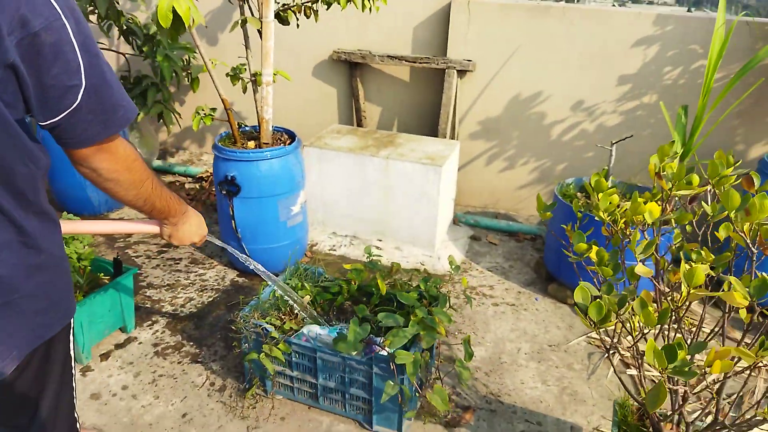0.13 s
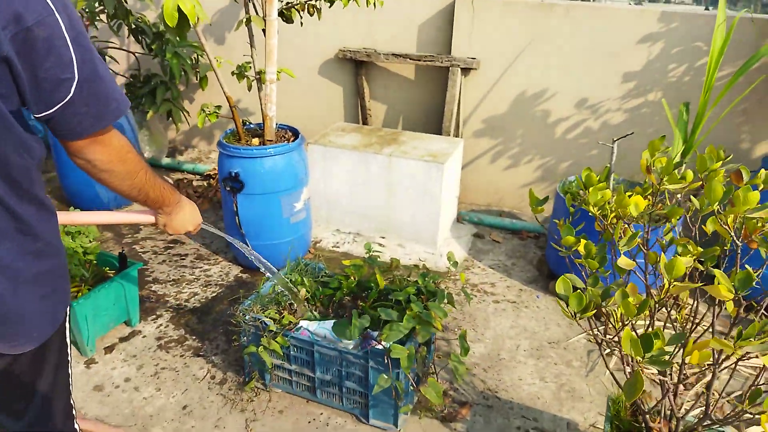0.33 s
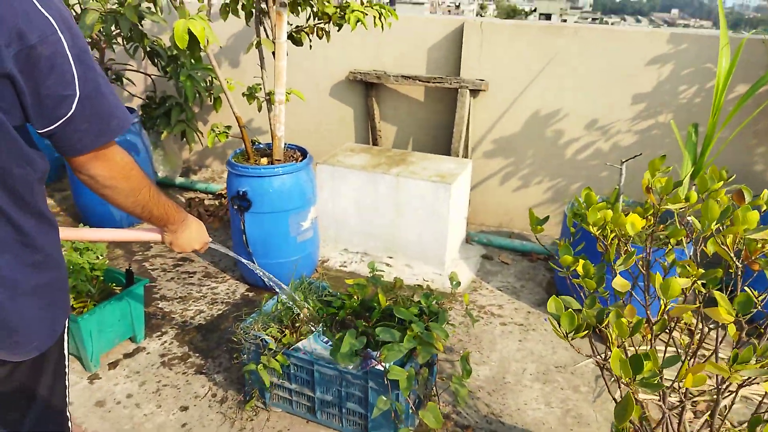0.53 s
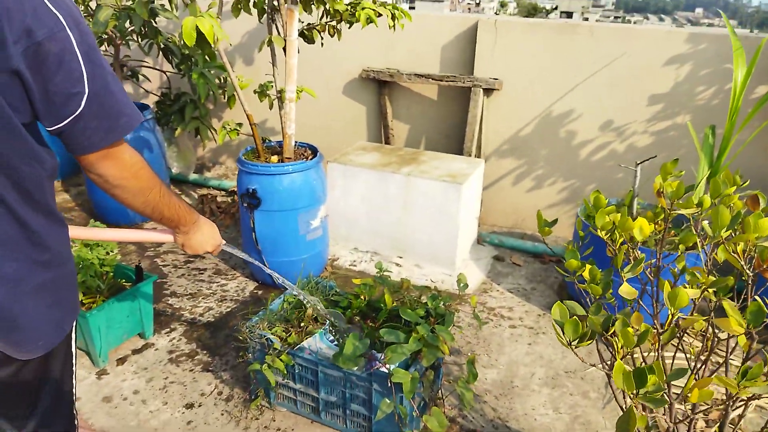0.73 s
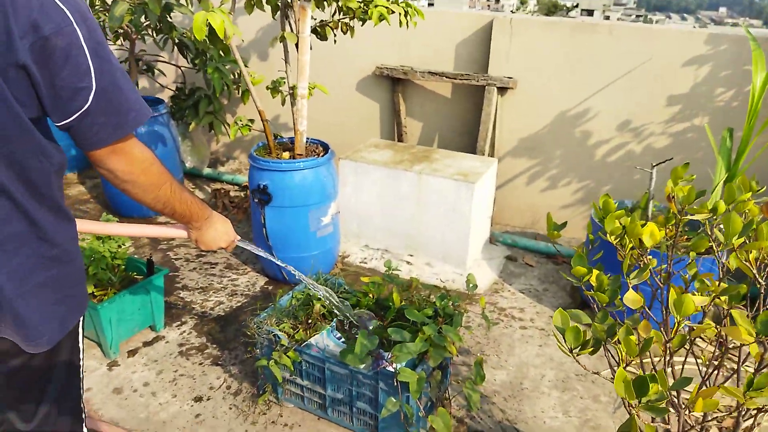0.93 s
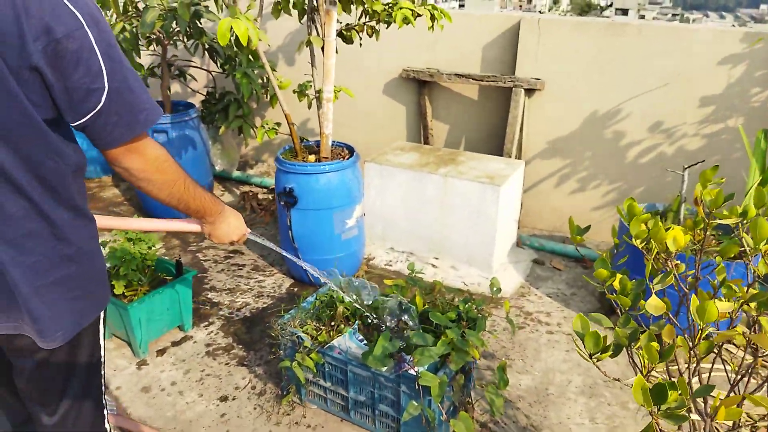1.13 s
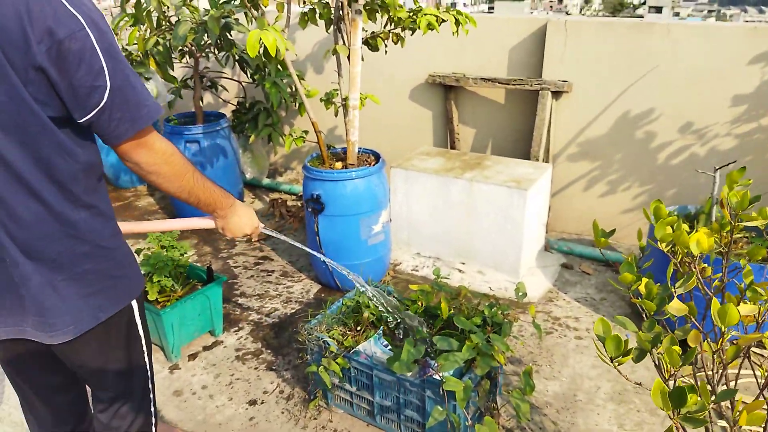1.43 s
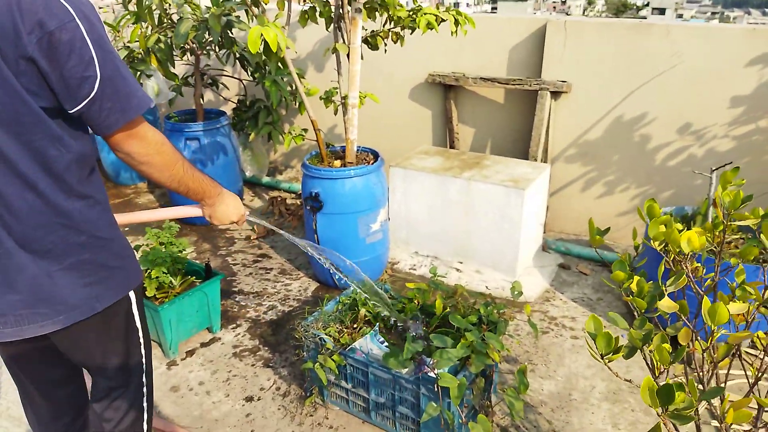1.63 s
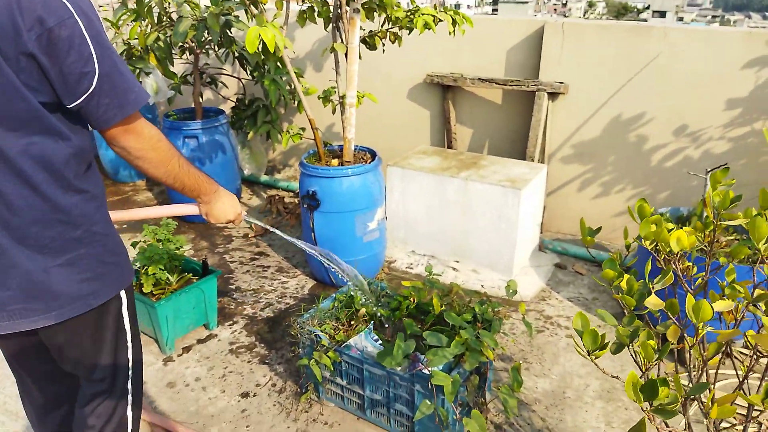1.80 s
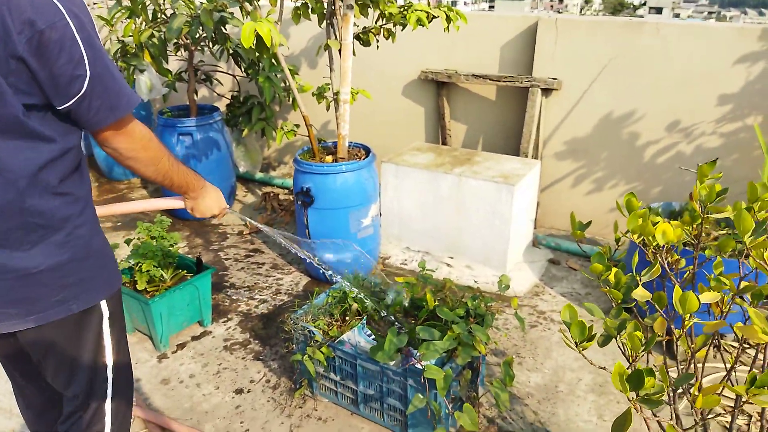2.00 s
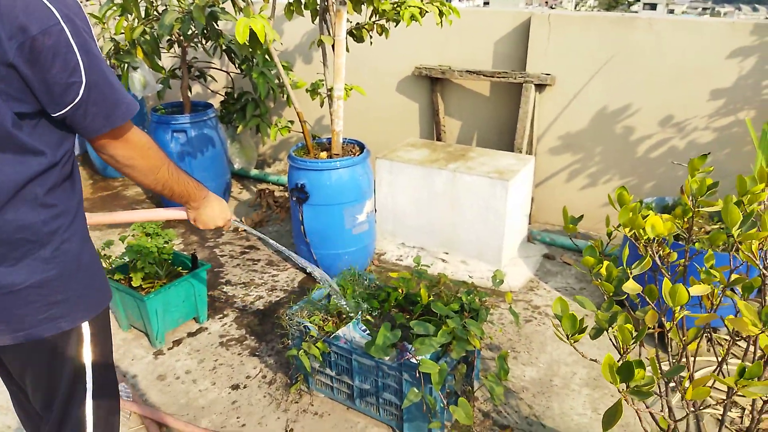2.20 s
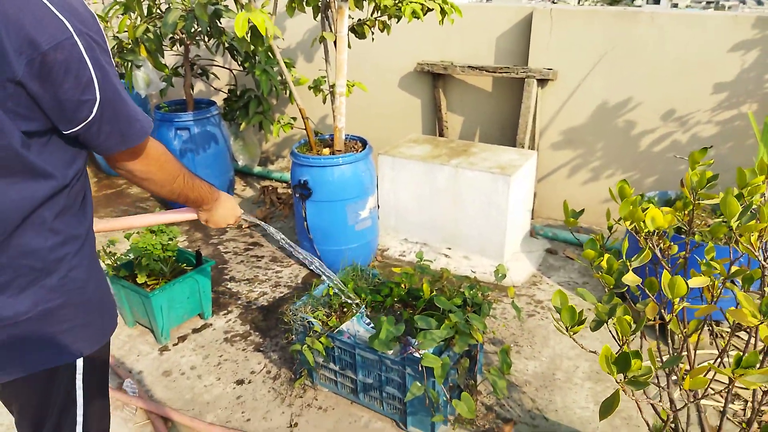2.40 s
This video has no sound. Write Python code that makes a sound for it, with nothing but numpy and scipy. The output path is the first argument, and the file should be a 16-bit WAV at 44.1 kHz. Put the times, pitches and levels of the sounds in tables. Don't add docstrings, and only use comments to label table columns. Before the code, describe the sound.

Garden hose water splashes steadily onto leaves and soil in a planter, with thumping wind buffets

```python
import sys
import numpy as np
from scipy import signal
from scipy.fft import rfft, irfft, next_fast_len
from scipy.io import wavfile
from scipy.ndimage import uniform_filter1d, map_coordinates

SR = 44100
rng = np.random.default_rng(int(sys.argv[2]) if len(sys.argv) > 2 else 0)


def elevation(decibels):
    levels = np.asarray(decibels, float)
    return 10 ** (levels / 20)


def store_pcm(level_fs):
    pcm = np.round(np.clip(level_fs, -1, 1) * 32767).astype(np.int16)
    wavfile.write(sys.argv[1], SR, np.atleast_2d(pcm).T)


N = 112454
TIME_S = np.arange(N) / SR
RAREST = 0.04


def unit(x):
    return x / np.sqrt(np.mean(x ** 2) + 1e-20)


def along(points, hz):
    point_hz, value = np.transpose(points)
    return np.interp(np.log(hz + 1), np.log(point_hz + 1), value)


def curve(rows):
    return np.interp(TIME_S, *np.transpose(rows))


def wobble(rate_hz):
    knots = rng.standard_normal(int(N * rate_hz / SR) + 4)
    return map_coordinates(knots, [np.arange(N) * rate_hz / SR])


def filtered(x, response):
    m = next_fast_len(N + SR // 2)
    return irfft(rfft(x, m) * response(np.fft.rfftfreq(m, 1 / SR)), m)[..., :N]


def impacts(count, spread_db, life_s):
    draw = rng.random((count, 2))
    power = elevation(-2 * spread_db * np.log(draw[:, 1] + RAREST))
    hits = np.bincount((draw[:, 0] * N).astype(int), power, N)
    decaying = signal.lfilter([1], [1, -np.exp(-2 / (life_s * SR))], hits)
    return unit(np.sqrt(np.abs(decaying)))


# freq_hz, correlation
PORT_LIKENESS = [(600, 0.19), (2400, 0.15), (5000, 0.048), (12000, 0.074)]


def spread(trace, spectrum):
    def mid_side(hz):
        turn = np.arccos(np.clip(along(PORT_LIKENESS, hz), -1, 1)) / 2
        return elevation(along(spectrum, hz)) * [np.cos(turn), np.sin(turn)]

    mid, side = filtered(rng.standard_normal((2, N)) * trace, mid_side)
    return unit(np.array([mid + side, mid - side]))


def bubbles(start_s, pitch_hz, gain, cycles):
    length = 400
    t = np.arange(length)[None] / SR
    life_s = cycles / pitch_hz[:, None]
    shape = np.exp(-t / life_s) * (1 - np.exp(-t * 4 / life_s)) * gain[:, None]
    phase = 2 * np.pi * pitch_hz[:, None] * t * (1 + 0.014 * t / life_s)
    where = (start_s * SR).astype(int)[:, None] + np.arange(length)
    ports = []
    for slip_rad in (rng.normal(0.95, 1.0, len(pitch_hz)), np.zeros(len(pitch_hz))):
        wave = shape * np.sin(phase + slip_rad[:, None])
        ports.append(np.bincount(where.ravel(), wave.ravel(), N + length)[:N])
    return np.array(ports)


# freq_hz, level_db
PATTER_SPECTRUM = [(300, -1), (600, -6.5), (1210, -8), (2000, -5), (2700, -2.5), (4600, -6), (5000, -11.5),
                   (7200, -18.5)]


def soil_patter(crackle):
    larger = impacts(count=600, spread_db=4, life_s=0.0057)
    return spread(0.63 + 0.5 * crackle + 0.31 * larger, PATTER_SPECTRUM)


# time_s, pitch_hz
GURGLE_PITCH = [(0, 2750), (.12, 2600), (.2, 2330), (.5, 2280), (.54, 3000), (.8, 2980), (1.05, 3060),
                (1.15, 2780), (2.55, 2880)]


def gurgle():
    count = 4000
    draw = rng.random((count, 2))
    start_s = draw[:, 0] * N / SR
    usual_hz = np.interp(start_s, *np.transpose(GURGLE_PITCH))
    pitch_hz = np.clip(usual_hz * np.exp(0.11 * rng.standard_normal(count)), 1500, 6000)
    gain = elevation(-4 * np.log(draw[:, 1] + 0.013))
    return unit(bubbles(start_s, pitch_hz, gain, cycles=2.26))


def burst(start_s, hold_s):
    rise_s, fall_s = 0.0066, 0.012
    t = TIME_S - start_s
    return np.clip(t / rise_s, 0, 1) * np.exp(-np.clip(t - hold_s, 0, None) / fall_s)


# start_s, over_pour_db, hold_s, centre_hz
JET_SURGES = [(0.161, 2, 0.047, 2170), (0.39, 2, 0.033, 3100), (0.407, 2.5, 0.057, 2180),
              (0.426, -5, 0.042, 4300), (0.685, -5.5, 0.035, 3460), (0.818, 0.5, 0.042, 3060),
              (0.874, 1.5, 0.04, 2010), (1.105, 1, 0.046, 3900), (1.125, 5, 0.05, 2630),
              (1.109, -1.5, 0.049, 1385), (1.253, -5, 0.059, 3400), (1.577, 0, 0.03, 2780),
              (1.692, -2, 0.056, 3070), (2.064, -5.5, 0.061, 2970)]


def surges(crackle):
    bubbles_over_hiss_db = -3
    total = np.zeros((2, N))
    for start_s, level_db, hold_s, hz in JET_SURGES:
        colour = [(hz / 5, -22), (hz / 1.3, -11), (hz, 0), (hz * 1.47, -9), (hz * 2.95, -24)]
        total += elevation(level_db) * burst(start_s, hold_s) * spread(1 + crackle, colour)
        chance = rng.random((60, 3))
        bubble_s = start_s + hold_s * chance[:, 0]
        pitch_hz = hz * np.exp(0.49 * (chance[:, 1] - 0.5))
        gain = elevation(level_db + bubbles_over_hiss_db - 1.7 * np.log(chance[:, 2] + RAREST))
        total += bubbles(bubble_s, pitch_hz, gain, cycles=4.3) * np.sqrt(hold_s / 0.059)
    return total


# freq_hz, level_db
FIZZ_SPECTRUM = [(4000, -8), (6700, -3.5), (7200, -30), (8600, -6.5), (9500, 0), (11400, -1), (12000, 4.5),
                 (15700, -1.5)]


def leaf_fizz(crackle):
    spits = impacts(count=300, spread_db=10.5, life_s=0.0009)
    return spread(1.8 + 0.15 * crackle + 0.5 * spits, FIZZ_SPECTRUM)


# time_s, level_db
POUR_LEVEL = [(0, -47.5), (.3, -48), (.5, -48.5), (.6, -46), (.8, -47.5), (1.05, -46), (1.3, -43),
              (1.65, -44.5), (1.9, -43), (2.3, -45.5), (2.55, -44.5)]
# time_s, level_db
SPRAY_LEVEL = [(0, -47), (.3, -46), (.65, -50), (1, -48), (1.15, -46.5), (1.3, -44.5), (1.42, -44),
               (1.65, -45), (1.85, -42.5), (2.15, -45), (2.3, -48), (2.55, -45)]


def stream():
    shake_db = 0.5 * wobble(10) + 1.2 * wobble(35)
    crackle = impacts(count=700, spread_db=1.5, life_s=0.0026)
    soil = soil_patter(crackle) + elevation(-7.5) * gurgle() + surges(crackle)
    soil_db = curve(POUR_LEVEL) + shake_db
    leaf_db = curve(SPRAY_LEVEL) + 0.73 * shake_db + 0.31 * wobble(52)
    return elevation(soil_db) * soil + elevation(leaf_db) * leaf_fizz(crackle)


# start_s, level_db, pitch_hz
PLOP_EVENTS = [(0.0633, -29, 2640), (0.184, -36, 2390), (.456, -30, 2030), (0.6946, -31, 3020),
               (0.8407, -27.5, 3040), (0.9916, -37, 3400), (1.0298, -32.5, 3050), (1.136, -35, 2580),
               (1.156, -47, 2530), (1.3047, -36, 2650), (1.429, -44, 2400), (1.59, -32, 2600),
               (1.6931, -34, 3040), (1.723, -32, 3030), (1.8688, -20, 2680), (1.9784, -36, 2570),
               (2.0858, -30, 2600), (2.197, -26.5, 2880), (2.3118, -25.5, 2880), (2.417, -29, 2500),
               (2.507, -23, 4000), (2.532, -30, 3180)]


def plops():
    start_s, level_db, pitch_hz = np.transpose(PLOP_EVENTS)
    return bubbles(start_s, pitch_hz, elevation(level_db + 0.5), cycles=4.1)


# start_s, peak_db
TICK_EVENTS = [(0.2738, -28.5), (0.775, -34), (1.4004, -22), (1.5359, -26), (1.8487, -23), (1.9764, -26),
               (2.089, -24), (2.129, -28), (2.1959, -27), (2.3825, -29), (2.5074, -26)]
# freq_hz, level_db
TICK_SPECTRUM = [(6000, -15), (11000, 3), (13500, 7.5)]


def ticks():
    rise_s, fall_60db_s = 0.0014, 0.041
    trace = np.zeros(N)
    for start_s, peak_db in TICK_EVENTS:
        t = TIME_S - start_s
        trace += elevation(peak_db - 60 * np.abs(t) / fall_60db_s) * np.clip(t / rise_s, 0, 1)
    port_gain = elevation([[-6], [-8.5]])
    return port_gain * trace * spread(np.ones(N), TICK_SPECTRUM)


def slap():
    start_s, level_db, pulse_hz = 2.3804, -14.5, 1500
    u = 2 * np.pi * pulse_hz * (TIME_S - start_s)
    pulse = -np.sin(u) * np.exp(-(u / 1.24) ** 2)
    ring = 0.11 * (u > 0) * np.exp(-np.abs(u) / 30) * np.sin(1.45 * u)
    return elevation(level_db) * (pulse + ring)


def swell(middle_s, length_s):
    squareness = 2.6
    return np.exp(-np.abs((TIME_S - middle_s) / (0.62 * length_s)) ** squareness)


def churn(spectrum):
    evened_share = 0.46
    x = unit(filtered(rng.standard_normal(N), lambda hz: elevation(along(spectrum, hz))))
    power = uniform_filter1d(uniform_filter1d(x * x, size=600), size=600)
    level = np.sqrt(np.abs(power)) + 0.056
    return unit(x / level ** evened_share)


# freq_hz, level_db
THUMP_SPECTRUM = [(25, -44), (50, -9), (80, -1.5), (105, 1), (145, 3.5), (220, -3), (320, -12.5),
                  (520, -55.5)]
# freq_hz, level_db
EDGE_SPECTRUM = [(150, 7.5), (300, 3), (400, 2.5), (520, -10.5), (750, -31), (1200, -24), (1800, -73)]


def port(eddies, flips, breeze):
    lull_edge_db, flutter_db, calm_share = -11.5, 4, 0.71
    lull = elevation(curve(breeze) + 2.64 * wobble(19))
    thump_power = lull ** 2
    edge_power = (lull * elevation(lull_edge_db)) ** 2
    for middle_s, thump_db, length_s, edge_over_db in eddies:
        thump_power += (elevation(thump_db) * swell(middle_s, length_s)) ** 2
        edge_power += (elevation(thump_db + edge_over_db) * swell(middle_s, 0.97 * length_s)) ** 2
    thump = np.sqrt(thump_power) * churn(THUMP_SPECTRUM)
    edge = np.sqrt(edge_power) * elevation(flutter_db * wobble(90)) * churn(EDGE_SPECTRUM)

    flip, calm = np.zeros(N), np.ones(N)
    for middle_s, peak_db, hz in flips:
        u = 2 * np.pi * hz * (TIME_S - middle_s)
        flip -= elevation(peak_db) * np.tanh(0.82 * np.sin(u)) * np.exp(-(u / 2.59) ** 2)
        calm *= 1 - calm_share * np.exp(-(u / 3) ** 2)
    return calm * (thump + edge) + flip


# middle_s, thump_db, length_s, edge_over_thump_db
LEFT_EDDIES = [(0.108, -24.5, 0.0087, -28), (0.195, -30, 0.011, -6), (0.224, -22.5, 0.01, -3.5),
               (0.342, -16.5, 0.017, -2.5), (0.46, -38, 0.062, 4.5), (0.512, -14, 0.032, -5),
               (0.535, -15.5, 0.021, -33), (0.554, -19, 0.019, 1), (0.6, -28.5, 0.058, -4),
               (0.655, -26, 0.062, -17), (0.77, -29.5, 0.13, -36), (0.804, -17.5, 0.04, -6.5),
               (0.906, -28, 0.046, -31), (0.956, -25, 0.011, -1), (1.013, -25.5, 0.0071, -4),
               (1.086, -14.5, 0.029, -8), (1.136, -32.5, 0.028, -2), (1.361, -27.5, 0.015, -20),
               (1.544, -27, 0.041, -18), (1.58, -27.5, 0.016, -7.5), (1.667, -32.5, 0.024, -4),
               (1.764, -27, 0.026, -9), (2.068, -23.5, 0.041, -5), (2.139, -20, 0.036, -1.5),
               (2.18, -39, 0.075, -29)]
RIGHT_EDDIES = [(0.333, -24, 0.035, 0.5), (0.383, -21, 0.025, 4), (0.434, -28, 0.033, 2.5),
                (0.585, -26, 0.013, -10), (0.63, -30, 0.051, -3.5), (0.693, -17.5, 0.018, -10),
                (0.803, -29, 0.12, -35), (0.912, -27, 0.028, -5.5), (1.11, -28, 0.018, -9),
                (1.21, -28.5, 0.032, -8), (1.26, -20.5, 0.0092, -20), (1.341, -25, 0.049, -18),
                (1.441, -28, 0.024, -12), (1.53, -22, 0.016, -14.5), (1.61, -25, 0.011, -31),
                (1.666, -25, 0.016, -1), (1.79, -25, 0.02, -0.5), (1.848, -30.5, 0.049, -11.5),
                (1.981, -27.5, 0.061, -11), (1.976, -30.5, 0.025, 12.5), (2.102, -33, 0.12, -4),
                (2.247, -24, 0.011, -21), (2.297, -21, 0.02, -8.5), (2.358, -28, 0.016, -17)]
# middle_s, peak_db, pitch_hz (negative: suction first)
LEFT_FLIPS = [(0.3324, -1.5, 354), (0.4986, -10.5, 170.0), (0.5135, -2, 375), (0.5326, -5.5, -200.0),
              (0.5456, -6, -170.0), (0.5622, -5.5, 294), (0.7831, -9.5, 131), (0.7999, -4.5, -170.0),
              (0.8245, -8, -200.0), (1.0778, -9, -330.0), (1.0966, -11, -140.0), (1.135, -13, 353),
              (1.5423, -18.5, 217), (1.6677, -10, 294), (1.7633, -19, -220.0), (2.0722, -12.5, -330.0),
              (2.1194, -11.5, 355), (2.1333, -18.5, 395), (2.1564, -8, -300.0), (2.1811, -15.0, 209)]
RIGHT_FLIPS = [(0.3305, -8, -250.0), (0.3854, -11, -400.0), (0.4001, -12.5, -200.0), (0.4332, -18, -270.0),
               (0.609, -18, 220.0), (0.693, -9.5, -190.0), (1.258, -15.0, 183), (1.3292, -15.0, -220.0),
               (1.3465, -19, 270.0), (1.4391, -22.5, 217), (1.5322, -16, 200.0), (1.6615, -14.0, -270.0),
               (1.6767, -11, 212), (1.7843, -30, -270.0), (1.798, -13.5, 281), (1.856, -18, 251),
               (1.9658, -15, -190.0), (1.9814, -8.5, 272), (2.0016, -12.5, 194), (2.2975, -14, 220)]
# time_s, level_db
LEFT_BREEZE = [(0, -36.5), (.3, -37), (.7, -43), (1.4, -38.5), (1.5, -45.5), (2, -45.5), (2.3, -36),
               (2.42, -52), (2.55, -33.5)]
RIGHT_BREEZE = [(0, -32.5), (.15, -38.5), (.3, -31), (.95, -40.5), (1.2, -37), (2.2, -33), (2.55, -41.5)]


def wind():
    left = port(LEFT_EDDIES, LEFT_FLIPS, LEFT_BREEZE)
    right = port(RIGHT_EDDIES, RIGHT_FLIPS, RIGHT_BREEZE)
    return np.array([left, right])


# freq_hz, left_minus_right_db
PORT_LEAN = [(700, 0), (1300, -3), (2500, -9), (4400, -2), (6800, 0), (7200, 9), (8600, 7), (9300, .6)]


def scene():
    water = stream() + plops() + ticks() + slap()
    half = np.array([[0.5], [-0.5]])
    water = filtered(water, lambda hz: elevation(along(PORT_LEAN, hz) * half))
    return water + wind()


def top_cut(x):
    return signal.sosfilt(signal.butter(12, 15860, fs=SR, output="sos"), x)


def record(dry):
    bass_cut_hz, top_hz = 74, 15820
    heard = filtered(dry, lambda hz: (hz < top_hz) / np.sqrt(1 + (bass_cut_hz / (hz + 1)) ** 8))
    return top_cut(heard)


dry = scene()
out = record(dry)
store_pcm(out)
```